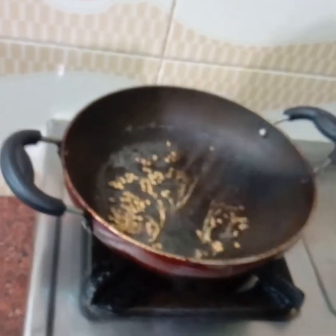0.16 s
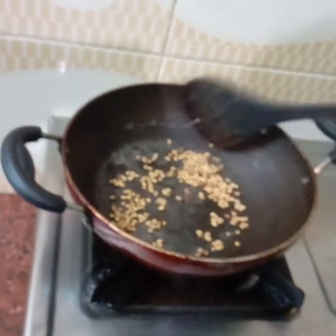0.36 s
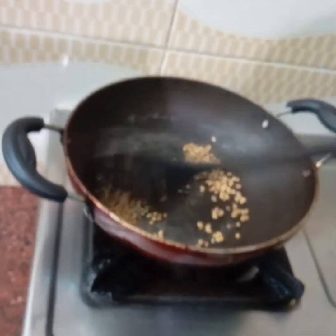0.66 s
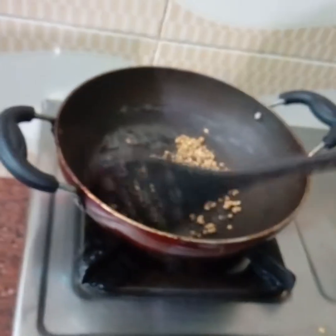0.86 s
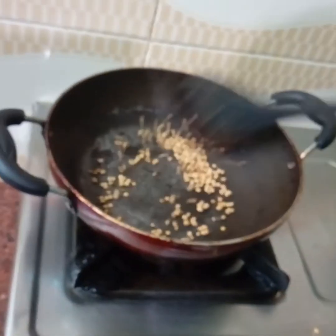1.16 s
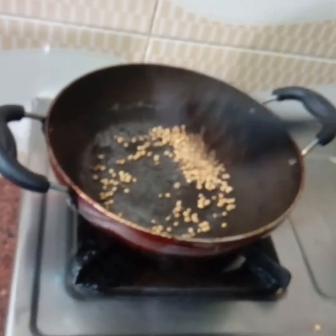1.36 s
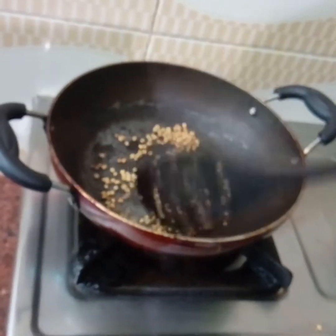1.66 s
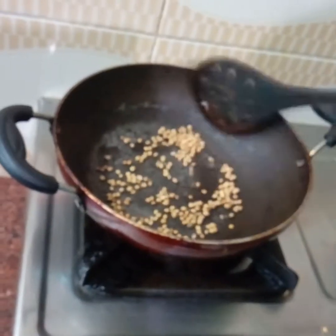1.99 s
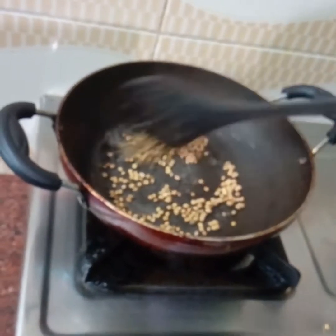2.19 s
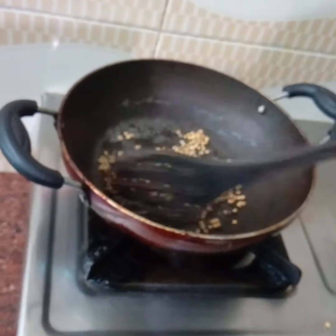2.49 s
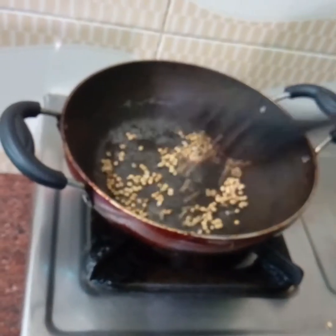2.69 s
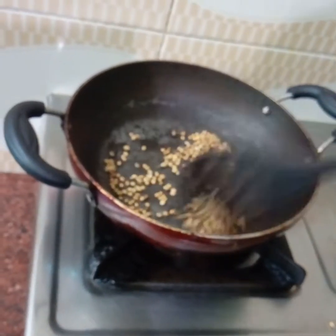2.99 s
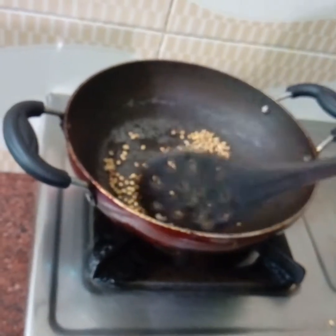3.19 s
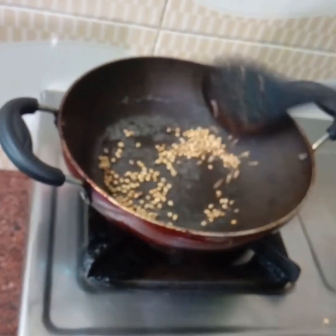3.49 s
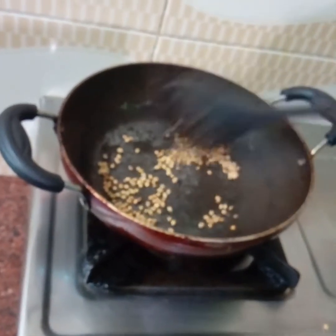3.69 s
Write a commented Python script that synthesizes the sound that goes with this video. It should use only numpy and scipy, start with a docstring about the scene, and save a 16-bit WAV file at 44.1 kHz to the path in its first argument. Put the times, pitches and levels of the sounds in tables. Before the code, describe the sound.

Spatula strokes scrape a ringing metal pan, starting with low dull knocks, then gritty seed rattles several times a second, softening toward the end. Heard close in stereo, over faint kitchen hum with short room reflections.

```python
"""A spatula rubs and rattles roasting seeds in a metal pan, close to a two-port phone in a kitchen.
Each stroke is dense grains of friction and seeds ringing the pan from a low rumble to a bright rattle.
Noise bursts make the spatula's knocks; impulses make bumps, seed clicks and blade tocks; gliding hiss makes
sliding seeds. Filtered noise gives a quiet kitchen with a low hum, and a decaying noise tail the room."""
import sys
import numpy as np
from scipy import signal
from scipy.fft import rfft, irfft, next_fast_len
from scipy.io import wavfile
from scipy.ndimage import uniform_filter1d

SR = 44100
rng = np.random.default_rng(int(sys.argv[2]) if len(sys.argv) > 2 else 0)


def transcribe(signal):
    """Save signal, clipped to [-1, 1], as a 16-bit WAV file at the path in sys.argv[1]."""
    frames = np.atleast_2d(signal).T
    limited = np.clip(frames, -1, 1)
    pcm = np.round(limited * 32767).astype(np.int16)
    wavfile.write(sys.argv[1], SR, pcm)


N = 169785
SIZE = next_fast_len(N + SR // 2)  # leaves space for filter tails
F = np.maximum(np.arange(SIZE // 2 + 1) * SR / SIZE, 1.)  # Hz

# Pan modes: (frequency [Hz], width [Hz])
MODE_HZ = [(238, 25), (308, 22), (332, 22), (365, 14), (412, 20), (444, 14), (590, 14), (880, 30),
           (925, 30), (1000, 30), (1040, 26), (1082, 30), (1845, 30), (1968, 30), (2300, 50), (3140, 20),
           (3183, 28), (3317, 24), (3770, 40), (4694, 30), (4760, 24), (4892, 40), (5220, 55), (5590, 60),
           (5965, 70), (6250, 120), (6510, 110), (6900, 40), (7150, 60), (7650, 50), (8200, 130),
           (8490, 35), (8880, 55), (9360, 180), (11070, 430), (13900, 300)]
# Strength of each pan mode: relative level [dB]
MODE_DB = [-8, 1, 1, -10.5, -12, -7, -21, -15, -21, -11.5, 4, -5.5, -11.5, -4, -14.5, -7.5, -6.5, -6, -11,
           -11, -7.5, -13.5, -15, -21.5, -12.5, -16, -12, -19.5, -27.5, -20.5, -21.5, -17.5, -23, -24,
           -25.5, -38.5]
# Broad sound between the modes: (frequency [Hz], relative density [dB])
PAN_BED = [(130, -23), (190, -29.5), (300, -10.5), (700, -26), (1040, -24.5), (1300, -16), (2000, -27),
           (2700, -23.5), (3300, -23.5), (4150, -29.5), (5000, -25), (6500, -24), (9500, -33.5),
           (10500, -51), (14000, -27), (16000, -27.5)]
PAN_MODES = [(hz, width_hz, db) for (hz, width_hz), db in zip(MODE_HZ, MODE_DB)]


def undb(db):
    """Decibels to amplitude."""
    return 10 ** (np.asarray(db) / 20)


def over_hz(table):
    """Read (Hz, value) points at every frequency, linear in log frequency."""
    hz, value = np.array(table, float).T
    return np.interp(np.log(F), np.log(np.maximum(hz, 1.)), value)


def through(x, response):
    """Filter by a frequency response."""
    return irfft(rfft(x, SIZE) * response, SIZE)[..., :N]


def ring(hz, width_hz):
    """Response of one resonance, gain 1 at its centre."""
    return 1j * F * width_hz / (hz ** 2 - F ** 2 + 1j * F * width_hz)


def rms(response):
    """Rms gain of a response to white noise."""
    return np.sqrt(np.mean(np.abs(response) ** 2))


def gliding(x, hz, width_hz):
    """Resonance with a moving centre: shift down to 0 Hz, low-pass, shift back; gain 1 at its centre."""
    turn = np.exp(2j * np.pi * np.cumsum(hz) / SR)
    pole = np.exp(-np.pi * width_hz / SR)
    smooth = signal.lfilter([1], [1, -pole], x / turn)
    return 2 * (1 - pole) * np.real(turn * smooth)


def walk(per_s):
    """Straight slews between random levels, per_s of them a second; spread about 1.4."""
    hold = int(SR / per_s)
    levels = np.repeat(rng.standard_normal(N // 200), hold)[:N]
    return 1.7 * uniform_filter1d(levels, hold)


def grains(per_s, spread_db):
    """Tiny impacts at random times and signs, a few much stronger than the rest; rms 1."""
    chance, strength, sign = rng.random((3, N))
    top = 6.5  # strongest grain, in spreads
    size = undb(spread_db * np.minimum(-np.log(strength + 1e-9), top))
    x = (chance < per_s / SR) * size * np.sign(sign - .5)
    return x / np.sqrt(np.mean(x ** 2))


def mode_sum(modes):
    """Modes add with alternating sign."""
    return sum((-1) ** j * undb(db) * ring(hz, width_hz) for j, (hz, width_hz, db) in enumerate(modes))


def pan_body():
    """Response of the whole pan: its modes over a broad bed."""
    return mode_sum(PAN_MODES) + undb(over_hz(PAN_BED))


def ports(shared, left, right):
    """Both ports hear a shared part with a phase lead and level tilt, plus a part of their own."""
    # Phase by which left leads: (frequency [Hz], lead [rad])
    lead = [(0, 0), (950, 0.4), (1550, 3.2), (2070, 1.2), (3190, 2.8), (4650, 2.4), (4910, -1.1),
            (6460, 2.9), (8270, 1.3), (10500, 19.8), (11700, 25.7), (12100, 24.5), (13400, 31.0),
            (15500, 31.2)]
    # Left minus right: (frequency [Hz], level difference [dB])
    balance = [(60, -0.5), (110, -0.5), (200, 3.5), (380, 3.5), (700, 0.5), (1290, 0.5), (2380, 1.0),
               (4400, -1.5), (8120, -2.5), (15000, 2.0)]
    # Power heard by one port only: (frequency [Hz], share [0-1])
    unlike = [(60, 0.19), (150, 0.13), (300, 0.12), (1000, 0.88), (3000, 0.73), (12000, 1)]
    share = np.clip(over_hz(unlike), 0, 1)
    tilt = undb(over_hz(balance) / 2) * np.exp(.5j * over_hz(lead))
    return np.array([through(shared, np.sqrt(1 - share) * gain) + through(own, np.sqrt(share) * np.abs(gain))
                     for gain, own in ((tilt, left), (1 / tilt, right))])


def strokes():
    """Grains swell with each stroke and ring the pan, band by band."""
    # Strokes, each a list of (time [s], low rumble [dB], hollow rub [dB], bowl ring [dB], blade rub [dB],
    # scrape [dB], seed rattle [dB], bright rattle [dB], top hiss [dB])
    stroke_levels = [
        [(0.0, -62, -65, -39.5, -48, -85, -71, -94, -97), (0.024, -51, -81, -75, -55, -84, -73, -100, -106),
         (0.04, -47, -76, -56, -52, -84, -87, -83, -87), (0.052, -38.5, -53, -34, -71, -92, -51.5, -87, -81)],
        [(0.062, -38, -40, -60, -49.5, -51.5, -56, -88, -74),
         (0.134, -46, -48.5, -52, -58, -53.5, -58, -77, -96),
         (0.232, -61, -56, -71, -63, -59, -53.5, -69, -101), (0.35, -81, -89, -89, -73, -69, -70, -91, -106)],
        [(0.362, -64, -73, -99, -53.5, -72, -82, -98, -106),
         (0.412, -60, -77, -69, -67, -72.5, -64.5, -97, -84), (0.502, -72, -73, -79, -70, -58, -60.5, -98, -82),
         (0.52, -86, -84, -51, -91, -56, -52.5, -83, -67)],
        [(0.53, -73, -96, -43, -69, -49, -59.5, -84, -83),
         (0.714, -49, -69.5, -51, -62.5, -59, -51.5, -60, -65),
         (0.832, -96, -84, -116, -73, -92, -71.5, -62.5, -80), (0.865, -69, -89, -86, -73, -75, -66, -62, -81)],
        [(0.875, -61, -78, -61, -71, -88, -66, -70, -82), (0.921, -48.5, -87, -83, -76, -62, -52, -58, -73),
         (0.947, -49.5, -90, -73, -75, -63, -59, -59, -65), (0.96, -47.5, -70, -43, -75, -57, -50, -56, -71)],
        [(0.972, -64.5, -79, -42, -62, -50, -51, -54, -65),
         (1.062, -60, -83, -38.5, -59, -46.5, -48.5, -57.5, -68),
         (1.204, -84, -91, -63.5, -73, -67.5, -56, -57, -62.5), (1.228, -68, -90, -90, -78, -72, -63, -61, -82)],
        [(1.24, -73, -67, -54, -64, -74, -61, -61.5, -88), (1.28, -49, -60, -60.5, -67.5, -79, -66, -70, -79),
         (1.41, -67, -77, -53.5, -71, -48, -49, -59, -68),
         (1.703, -103, -99, -81.5, -99, -75.5, -67.5, -75.5, -90)],
        [(1.718, -73, -73, -78, -89, -57, -36.5, -43, -64), (1.755, -66.5, -65, -72, -80, -53, -48, -62, -79),
         (1.768, -59, -65, -49.5, -85, -57.5, -46.5, -59, -81),
         (1.816, -61, -67.5, -54, -85, -63.5, -55, -70.5, -90),
         (1.982, -112, -99, -102, -85, -79.5, -81.5, -91, -106),
         (2.007, -84, -85, -85, -69, -85, -87, -102, -104)],
        [(2.018, -73, -57.5, -88, -49, -84, -65, -89, -100), (2.048, -50, -65, -82, -58, -81, -74.5, -86, -104),
         (2.124, -52, -65, -83, -64, -59.5, -53.5, -63.5, -63),
         (2.205, -59, -62, -54, -77, -59, -51.5, -60, -60.5)],
        [(2.22, -68, -70, -44, -59, -47.5, -51, -67, -65.5), (2.29, -70, -70, -59.5, -62, -53, -52.5, -60, -65),
         (2.316, -69, -62, -56, -67, -50, -44.5, -57, -52), (2.335, -57, -60, -74, -57, -58.5, -53, -57, -64)],
        [(2.347, -45, -54.5, -48, -55.5, -50.5, -48, -58, -63),
         (2.4, -45, -54.5, -61, -59, -62.5, -63.5, -65, -75), (2.503, -57, -79, -87, -68, -78, -65.5, -67, -73),
         (2.58, -62.5, -77, -69, -69, -55, -52, -61, -73)],
        [(2.59, -59.5, -96, -47.5, -80, -50, -53, -63.5, -62),
         (2.676, -86, -95, -46, -74, -54, -55.5, -62.5, -76),
         (2.762, -66.5, -102, -56, -74, -65.5, -62.5, -66.5, -75),
         (2.85, -73, -79, -100, -79, -86, -61.5, -68, -75)],
        [(2.86, -63, -77, -85, -77, -66, -61, -70.5, -87),
         (2.992, -67.5, -72, -55, -70, -50, -50.5, -56.5, -65),
         (3.128, -94, -85, -102, -91, -76, -61, -62.5, -78), (3.22, -100, -99, -102, -86, -68, -66.5, -74, -85)],
        [(3.232, -70, -81, -79, -76, -64, -48.5, -75, -67), (3.25, -57.5, -67, -72, -70, -56, -55, -62, -63),
         (3.266, -57, -61, -71, -66, -60.5, -51, -60, -69), (3.285, -53, -53, -46, -78, -56, -54.5, -59, -76)],
        [(3.297, -56, -60, -43, -78, -50.5, -53.5, -70, -98),
         (3.381, -64.5, -81, -59.5, -68, -57.5, -56, -67.5, -67.5),
         (3.537, -96, -87, -101, -100, -81, -68.5, -69.5, -79),
         (3.645, -67.5, -78, -75, -77, -86, -77, -95, -80)],
        [(3.66, -72.5, -73, -69, -82, -60, -55.5, -70, -72),
         (3.736, -75.5, -80, -60.5, -82, -59, -57, -79, -92),
         (3.816, -85, -84, -77.5, -85, -64.5, -56.5, -74, -77), (3.85, -80, -89, -91, -100, -74, -65, -85, -90)],
    ]
    # Grain rate in each band: rate [1/s]
    grain_rates = [3000, 2500, 5000, 2500, 2500, 3000, 3000, 4000]
    # Band edges: (low [Hz], high [Hz])
    bands = [(150, 475), (475, 960), (960, 1130), (1130, 1800), (1800, 4200), (4200, 7250), (7250, 9900),
             (9900, 16500)]
    grain_spread_db = 2.6
    # depths multiply walk()
    flicker_db, flicker_per_s = 1.5, 60
    spot_db, spot_per_s = 3.0, 14
    waver_widths, waver_per_s = 0.3, 12

    t = np.arange(N) / SR
    table = np.concatenate([np.array(s, float) for s in stroke_levels])
    out = 0
    for k, (lo, hi) in enumerate(bands):
        level_db = np.interp(t, table[:, 0], table[:, k + 1])
        gain = undb(level_db + flicker_db * walk(flicker_per_s))
        drive = np.array([gain * grains(grain_rates[k], grain_spread_db) for _ in range(3)])
        modes = [m for m in PAN_MODES if lo <= m[0] < hi]
        bed = undb(over_hz(PAN_BED)) / np.sqrt((1 + (lo / F) ** 16) * (1 + (F / hi) ** 16))
        scale = rms(bed + mode_sum(modes))
        part = through(drive, bed)

        # modes trade strength, at constant total power, as the contact moves over the pan
        spots = np.array([undb(spot_db * walk(spot_per_s)) for _ in modes]).reshape(-1, N)
        power = np.array([width_hz * undb(db) ** 2 for _, width_hz, db in modes])
        spots = spots * np.sqrt(power.sum() / (power @ spots ** 2 + 1e-18))
        for j, (hz, width_hz, db) in enumerate(modes):
            # the pressing blade bends each mode's pitch
            bent_hz = hz + waver_widths * width_hz * walk(waver_per_s)
            part = part + (-1) ** j * gliding(drive * undb(db) * spots[j], bent_hz, width_hz)
        out = out + part / scale
    return ports(*out)


def kitchen():
    """Steady noise shaped as soft room sound, a low wavering hum and a faint drone above it."""
    # Room noise spectrum: (frequency [Hz], relative density [dB])
    room_noise = [(18, -29), (30, -19), (70, -14), (200, -6), (945, -2.5), (1170, -16), (1820, 3.5),
                  (3150, -15), (5590, 3), (15500, -51)]
    parts = [(undb(over_hz(room_noise)), -77),  # (response, level dB)
             (ring(106.7, 28), -75.5),  # hum: Hz, width Hz
             (ring(233, 10.5) ** 2, -84)]  # drone
    response = sum(undb(db) * shape / rms(shape) for shape, db in parts)
    return ports(*through(rng.standard_normal((3, N)), response))


def knocks(body):
    """Short bursts of spatula contact ring the pan: dull part the low modes, hard part the high modes."""
    # Spatula knocks: (time [s], dull thud drive [relative dB], bright tap drive [relative dB])
    blows = [(0.058, -26, -51), (0.078, -39, -60), (0.124, -30.5, -60), (0.162, -34, -62),
             (0.357, -39, -70), (0.503, -50, -49), (0.587, -33, -65), (0.914, -41, -40), (0.972, -33, -59),
             (1.231, -41.5, -61), (1.713, -30.5, -20), (2.012, -37.5, -61), (2.112, -53, -36),
             (2.171, -51, -34.5), (2.219, -32, -64), (2.307, -56, -36), (2.343, -26, -71),
             (3.229, -52, -59), (3.294, -30, -46), (3.655, -59, -43.5)]
    burst_decay_s, edge_db = 0.0014, 10.5  # edge: first contact, over the burst that follows
    thud_band_hz, tap_low_hz = [278, 1900], 2480
    tap_extra_db, ring_db = 5.5, -7

    out = np.zeros((2, 3, N))
    tail_s = np.arange(SR // 20) / SR
    for s, thud_db, tap_db in blows:
        burst = rng.standard_normal((3, len(tail_s))) * np.exp(-tail_s / burst_decay_s)
        burst[:, 0] = undb(edge_db)
        i = int(s * SR)
        out[:, :, i:i + len(tail_s)] += undb([thud_db, tap_db + tap_extra_db])[:, None, None] * burst
    thud = signal.sosfilt(signal.butter(2, thud_band_hz, "band", fs=SR, output="sos"), out[0])
    tap = signal.sosfilt(signal.butter(2, tap_low_hz, "high", fs=SR, output="sos"), out[1])
    return undb(ring_db) * ports(*through(thud + tap, body / rms(body)))


def bumps():
    """The pan bumps on its stand: impulses through a broad low double resonance."""
    # Bumps: (time [s], level [dB])
    thumps = [(0.061, -48.5), (0.126, -38.5), (0.703, -55), (1.425, -52.5), (2.403, -56), (3.326, -57)]
    hits = np.zeros((3, N))
    for s, db in thumps:
        hits[:, int(s * SR)] = undb(db)
    thump = ring(125, 274) ** 2  # Hz, width Hz
    return ports(*through(hits, thump / rms(thump) ** 2))


def clicks(body):
    """Single seeds snap: a broad, very short resonance with a trace of the pan's ring."""
    # Seed clicks: (time [s], level [dB], left minus right [dB], pitch [Hz])
    snaps = [(0.125, -41.5, 14, 1200), (0.197, -41, -12, 3100), (0.704, -41.5, -20.5, 1510),
             (0.777, -42.5, -22, 3800), (1.412, -43, -10, 2780), (1.417, -51, -12, 2780),
             (1.429, -41, -24, 2580), (2.117, -41, 0, 7000), (2.176, -38, 6, 9500),
             (2.311, -37.5, 4, 12000)]
    width_over_pitch, top_hz, pan_ring_db = 0.78, 11400, 6.5
    out = 0
    for s, db, side_db, hz in snaps:
        tick = np.zeros((2, N))
        tick[:, int(s * SR)] = -undb(db + np.array([side_db, -side_db]) / 2)
        snap = ring(hz, width_over_pitch * hz) / (1 + 1j * F / top_hz) ** 2
        response = snap / rms(snap) ** 2 + undb(pan_ring_db) * body / rms(body)
        out = out + through(tick, response)
    return out


def slides():
    """Seeds slide down the wall: noise through two equal resonances that glide down and swell once."""
    # Slides: (start [s], end [s], from [Hz], to [Hz], width of each resonance [Hz], level at middle [dB])
    runs = [(0.167, 0.424, 6600, 6360, 840, -57), (1.935, 2.135, 5730, 5270, 496, -67.5),
            (2.942, 3.28, 1880, 1610, 390, -62.5)]
    t = np.arange(N) / SR
    out = 0
    for t0, t1, hz0, hz1, width_hz, db in runs:
        progress = np.clip((t - t0) / (t1 - t0), 0, 1)
        hz = hz0 + (hz1 - hz0) * progress
        band = gliding(gliding(rng.standard_normal((3, N)), hz, width_hz), hz, width_hz)
        out = out + undb(db) * np.sin(np.pi * progress) * band / np.std(band)
    return ports(*out)


def touches():
    """The blade's edge touches down and rings by itself: a short hollow tock of one resonance."""
    # Blade touches: (time [s], level [dB])
    tocks = [(0.358, -50.5), (1.233, -58), (2.014, -47), (2.344, -42)]
    blade_hz, width_hz = 1270, 64
    hits = np.zeros((3, N))
    for s, db in tocks:
        hits[:, int(s * SR)] = undb(db) * SR / (2 * np.pi * width_hz)  # offsets the narrow ring's low peak
    return ports(*through(hits, ring(blade_hz, width_hz)))


def room(near):
    """Diffuse reflections: decaying noise, separate for each port, from 4 ms on."""
    t60_s, level_db = 0.18, -10.5
    tail_s = np.arange(SR // 3) / SR
    echo = rng.standard_normal((2, len(tail_s))) * undb(-60 * tail_s / t60_s) * (tail_s > .004)
    echo = echo / np.sqrt(np.sum(echo ** 2, axis=1, keepdims=True))
    return undb(level_db) * through(near, rfft(echo, SIZE))


def scene():
    """All pan sounds with their room, over the kitchen."""
    body = pan_body()
    near = strokes() + slides() + bumps() + touches() + knocks(body) + clicks(body)
    return near + room(near) + kitchen()


def record(dry):
    """The phone cuts the top steeply."""
    top_hz = 15650
    return signal.sosfilt(signal.ellip(12, .2, 90, top_hz, fs=SR, output="sos"), dry)


dry = scene()
out = record(dry)
transcribe(out)
```